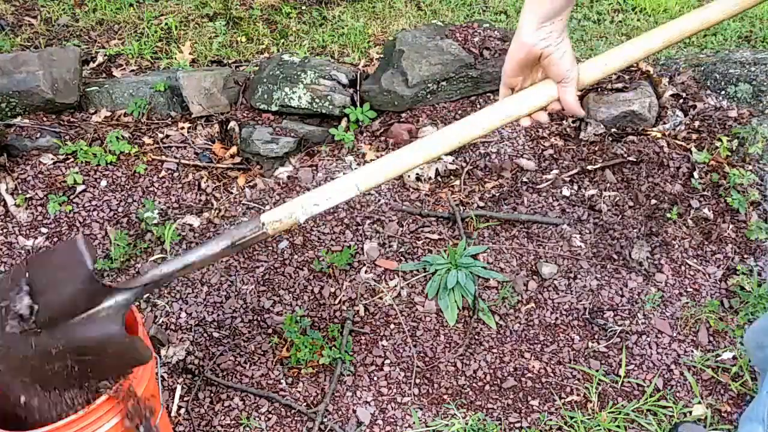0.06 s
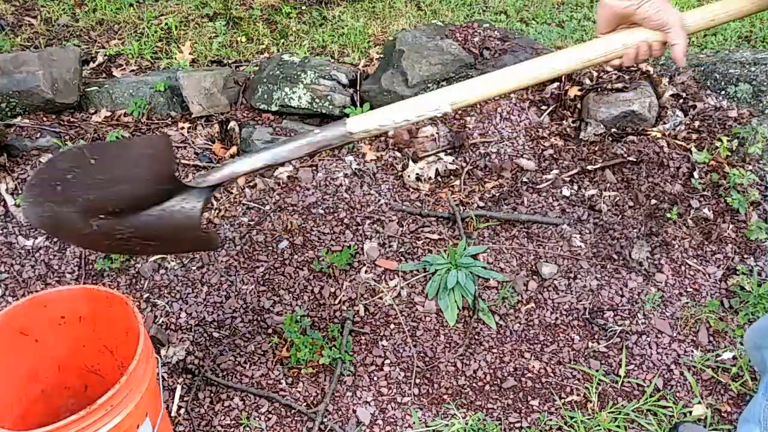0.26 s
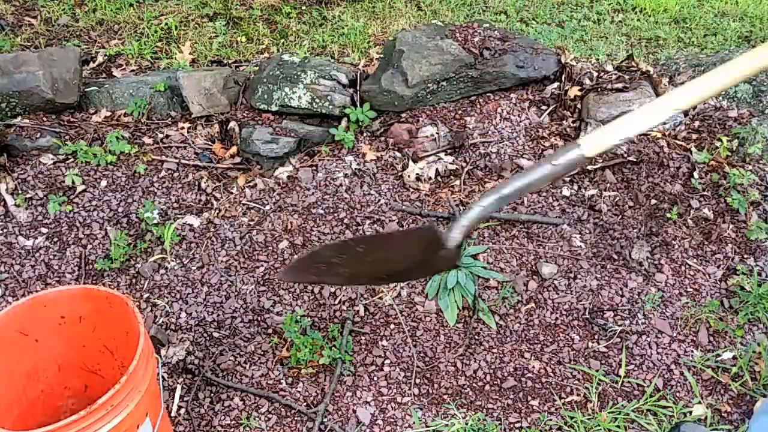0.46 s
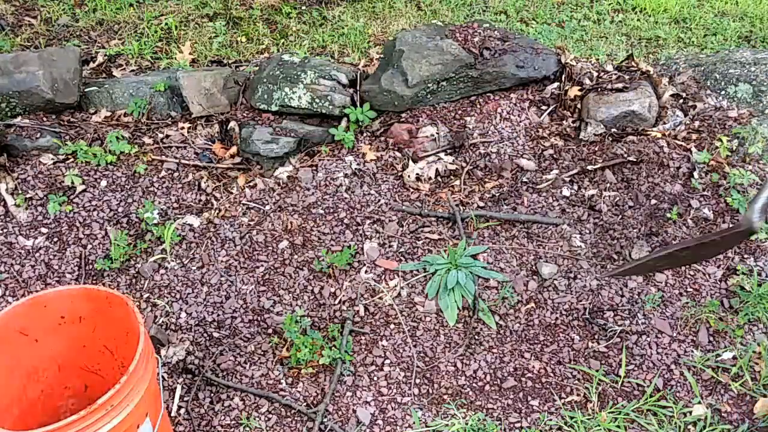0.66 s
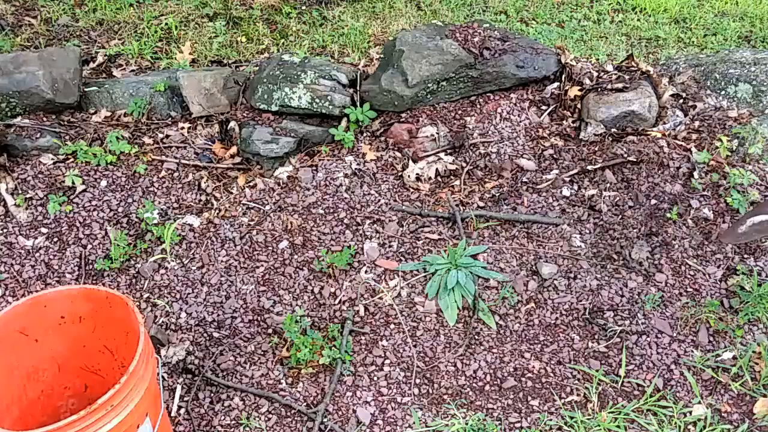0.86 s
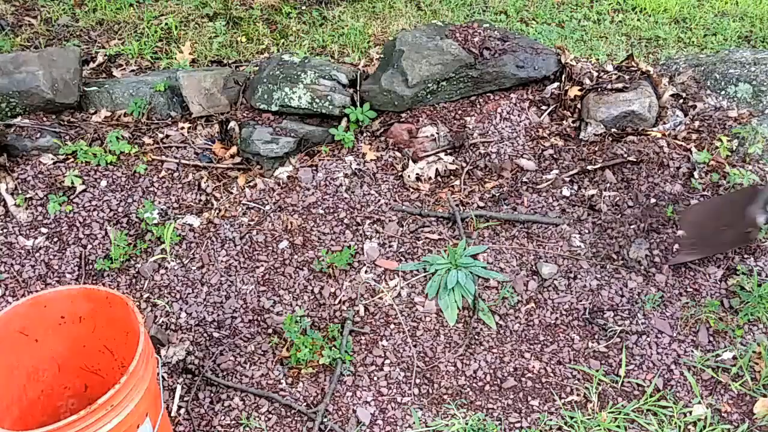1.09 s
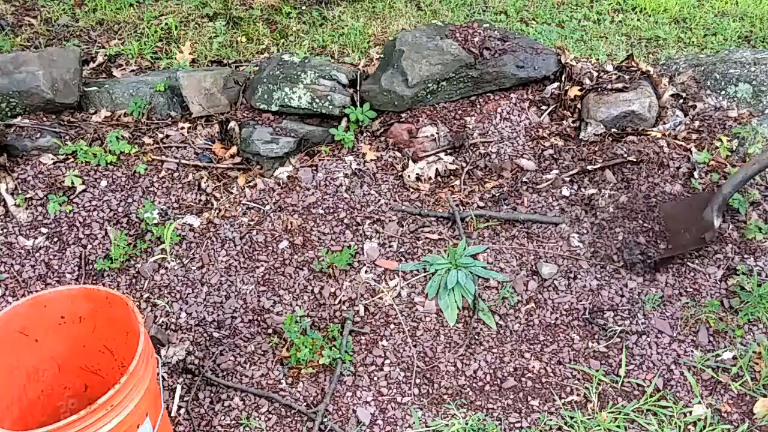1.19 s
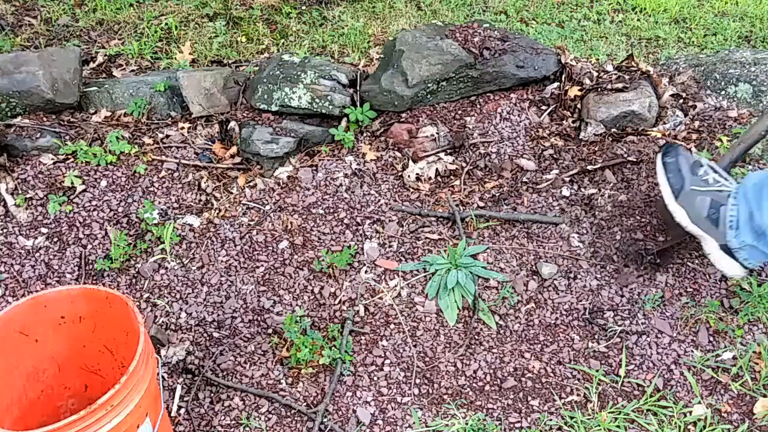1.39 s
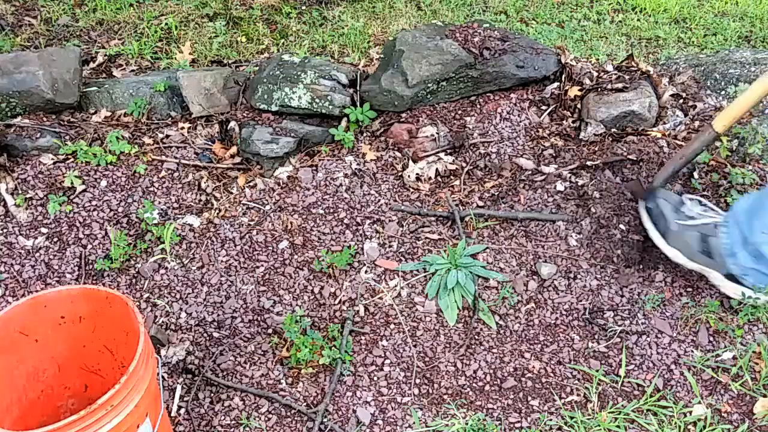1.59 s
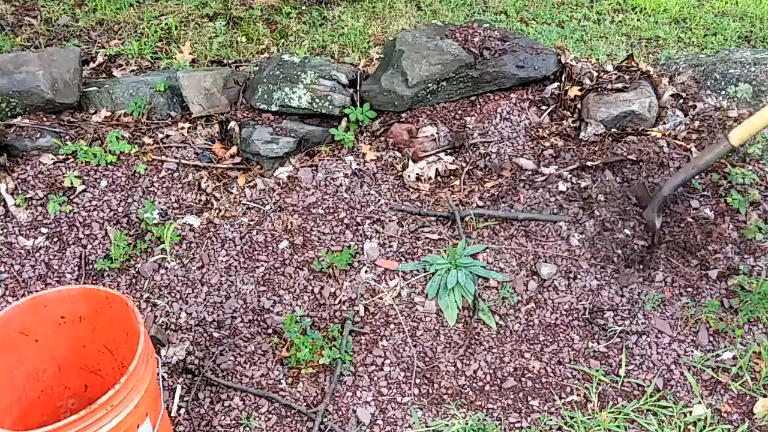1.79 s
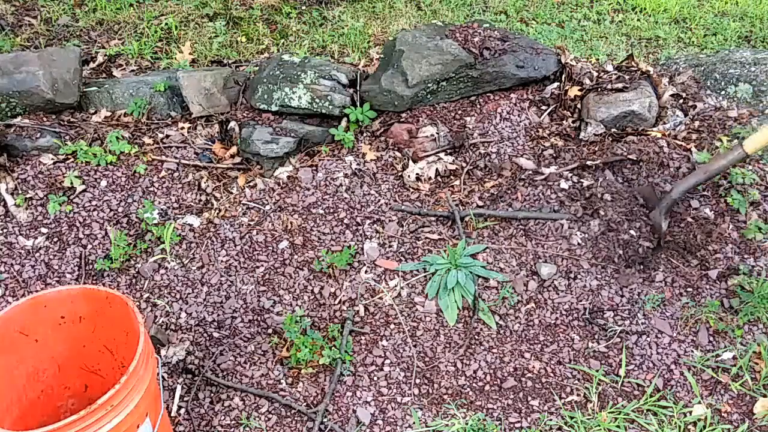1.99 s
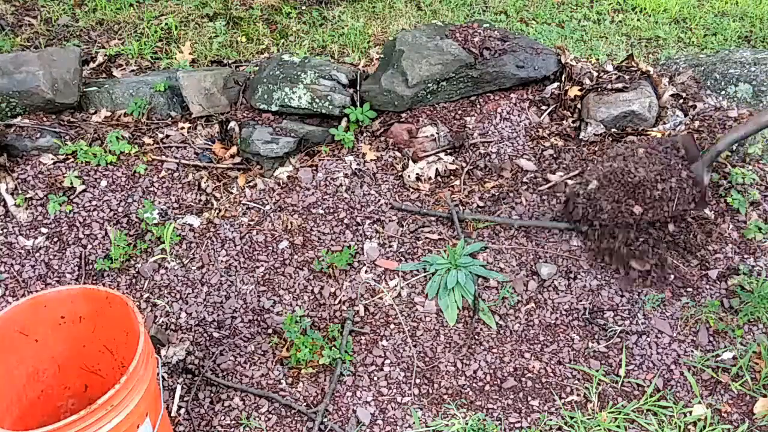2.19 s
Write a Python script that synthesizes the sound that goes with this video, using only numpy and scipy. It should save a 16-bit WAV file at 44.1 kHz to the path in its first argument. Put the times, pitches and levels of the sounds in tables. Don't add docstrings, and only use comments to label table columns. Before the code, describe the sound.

Gravel shovelling, heard close outdoors: a loud burst of stones batters a plastic bucket, a faint rattle and crunch follow, then a bright scraping stab, a duller stamp and small grinding clicks over faint insects and distant traffic.

```python
import sys
import numpy as np
from scipy import signal
from scipy.fft import rfft, irfft, next_fast_len
from scipy.io import wavfile
from scipy.ndimage import uniform_filter1d, map_coordinates

SR = 44100
rng = np.random.default_rng(int(sys.argv[2]) if len(sys.argv) > 2 else 0)


def transcribe(signal):
    frames = np.atleast_2d(signal).T
    limited = np.clip(frames, -1, 1)
    pcm = np.round(limited * 32767).astype(np.int16)
    wavfile.write(sys.argv[1], SR, pcm)


def attenuation_scalar(level_db):
    decades = np.asarray(level_db, float) / 20
    return 10 ** decades


N = 99225

# time in seconds, force in dB, heavy stones over grit in dB.
POUR_FORCE = [(.188, -49, -8), (.194, -21.5, 2.5), (.22, -20, 5), (.262, -18.5, 1), (.285, -26.5, 0),
              (.345, -32, 0), (0.371, -48.5, 6.5), (0.452, -57.5, -8), (0.538, -83, -15.5)]
# pitch in Hz, width in Hz, level in dB.
BUCKET_MODES = [(570, 25, -6.5), (740, 23, -6), (1090, 1400, -4.5), (1528, 46, 3), (1748, 30, -4),
                (1901, 39, -4), (3062, 120, -10)]
# pitch in Hz, width in Hz, level in dB.
BLADE_MODES = [(730, 97, -17), (1106, 60, -8), (1399, 140, -5), (1957, 110, -17.5), (2810, 49.6, -8.5),
               (2910, 22, -6)]


def unit(x):
    return x / np.sqrt(np.mean(x ** 2) + 1e-20)


def along(points, hz):
    f, v = np.transpose(points)
    return np.interp(np.log(hz + 1), np.log(f + 1), v)


def curves(rows):
    s, first, *cols = np.transpose(rows)
    t = np.arange(N) / SR
    return [np.interp(t, s, first, -140, -140)] + [np.interp(t, s, c) for c in cols]


def wobble(rate):
    knots = rng.standard_normal(int(N * rate / SR) + 4)
    return map_coordinates(knots, [np.arange(N) * rate / SR])


def filtered(x, response):
    m = next_fast_len(N + SR // 8, True)
    return irfft(rfft(x, m) * response(np.fft.rfftfreq(m, 1 / SR)), m)[..., :N]


def peak(f, hz, width_hz):
    return 1j * f * width_hz / (hz * hz - f * f + 1j * f * width_hz)


def noise_mode(hz, width_hz):
    return unit(filtered(rng.standard_normal(N), lambda f: peak(f, hz, width_hz) ** 2))


def sizes(u):
    scatter_db, biggest_db = 2.2, 4
    return attenuation_scalar(np.minimum(-scatter_db * np.log(u), biggest_db))


def clicks(at, hz, size, cycles):
    k = np.arange(128)
    turns = k * hz[:, None] / SR
    waves = size[:, None] * np.sin(2 * np.pi * turns) * np.exp(-turns / cycles) * (1 - k / len(k))
    return np.bincount((at[:, None] + k).ravel(), waves.ravel(), N + len(k))[:N]


def grit(span, spectrum, tilt_db):
    grains_per_s, hiss_share, top_from_hz = 5000, 0.62, 8430
    a, b = span
    u = rng.random((int(grains_per_s * (b - a) / SR), 3))
    lo, hi = spectrum[1][0], spectrum[-2][0]
    hz = lo + (hi - lo) * u[:, 1]
    at = a + (u[:, 0] * (b - a)).astype(int)
    white = clicks(at, hz, sizes(u[:, 2]) * hz ** .5, cycles=2.5)
    white = white / white[a:b].std() + hiss_share * rng.standard_normal(N)

    def colour(f):
        return attenuation_scalar(along(spectrum, f) + tilt_db * np.log2(np.clip(f / 6000, 1, 1.6)))

    full = filtered(white, colour)
    main = filtered(full, lambda f: 1 / (1 + (f / top_from_hz) ** 24))
    return np.array([main, full - main]) / main[a:b].std()


def flow(span_s, force_db, weight_db, body, low_hz, tilt_db, knee_db):
    # frequency in Hz, density in dB per Hz.
    grit_colour = [(1300, -67.5), (2500, -6), (3150, -6), (4270, -4.5), (6490, 0), (8600, -9), (15600, -22),
                   (16200, -51.5)]
    blows_per_s, dead_share, knock_top_hz = 2000, 0.98, 2300
    a, b = int(span_s[0] * SR), min(int(span_s[1] * SR), N)
    main, top = grit((a, b), grit_colour, tilt_db)
    clump_db = np.clip(-force_db / 18, 1, 2.5)
    top_db = 2.4 * np.minimum(force_db - knee_db, 0)
    fine = attenuation_scalar(force_db + clump_db * wobble(150)) * (main + attenuation_scalar(top_db) * top)

    u = rng.random((3, N))
    blows = (u[0] < blows_per_s / SR) * sizes(u[1]) * np.sign(u[2] - .5)

    def wall(f):
        band = signal.butter(6, [low_hz, 3600], 'band', analog=True)
        dead = dead_share / (1 + (1j * f / knock_top_hz)) ** 2
        modes = sum(attenuation_scalar(db) * peak(f, hz, width_hz) for hz, width_hz, db in body)
        return signal.freqs(*band, f)[1] * (dead + modes)

    driven = attenuation_scalar(force_db + weight_db + clump_db * wobble(90))
    steady, heavy = filtered(blows * [np.ones(N), driven], wall)
    return fine + heavy / steady[a:b].std()


def stroke(rows, body, low_hz, tilt_db, knee_db):
    return flow((rows[0][0], rows[-1][0]), *curves(rows), body, low_hz, tilt_db, knee_db)


def pushes(rows, width):
    t, out = np.arange(N) / SR, np.zeros(N)
    for s, length, db, hz, t60 in rows:
        attack = np.clip((t - s) / .006, 0, 1)
        decay = attenuation_scalar(-60 * np.maximum(t - s - length, 0) / t60)
        out += attenuation_scalar(db) * attack * decay * noise_mode(hz, width * hz)
    return out


def garden():
    # frequency in Hz, density in dB per Hz.
    garden_colour = [(25, -11.5), (100, -5.5), (250, -20.5), (2400, -24), (4600, -10), (7600, -15),
                     (8400, -31), (16500, -45)]
    # start in seconds, length in seconds, pitch in Hz, level in dB rms.
    calls = [(.02, .105, 3580, -67), (0, .018, 3050, -66), (.47, .23, 3850, -73), (1.1, .07, 1850, -74),
             (.03, .02, 1900, -68), (1.05, .02, 800, -64), (1.05, .015, 1300, -68),
             (1.445, .025, 1350, -68)]
    level_db, patchy_db = -63.5, 5
    z = signal.stft(rng.standard_normal(N + 512), nperseg=512)[2]
    field = uniform_filter1d(rng.standard_normal(z.shape), 3, 0)
    field = uniform_filter1d(field, 6, 1)
    bed = signal.istft(z * attenuation_scalar(patchy_db * unit(field)), nperseg=512)[1][:N]
    out = attenuation_scalar(level_db) * unit(filtered(bed, lambda f: attenuation_scalar(along(garden_colour, f))))
    t = np.arange(N) / SR
    for s, length, hz, db in calls:
        gate = np.clip(np.minimum(t - s, s + length - t) / 0.0044, 0, 1)
        turns = np.cumsum(hz + 45 * wobble(300)) / SR
        out += gate * attenuation_scalar(db + 3 * wobble(90)) * np.sin(2 * np.pi * turns)
    return out


def loose():
    # start in seconds, force in dB, heavy stones over grit in dB, dying in dB per second.
    handfuls = [(0.126, -32.5, 1, 144), (0.136, -36, -5, 1204), (0.148, -36, -8, 705),
                (0.154, -39, 0.5, 496.5), (.161, -31.5, 3, 694), (0.178, -37.5, 4, 297.5)]
    s, db, weight_db, dying = np.transpose(handfuls)
    t, end_s = np.arange(N) / SR, POUR_FORCE[1][0]
    last = np.maximum(np.searchsorted(s, t) - 1, 0)
    force_db = np.where(t > s[0], db[last] - dying[last] * (t - s[last]), -70)
    force_db = uniform_filter1d(force_db, size=60)
    force_db[(t < s[0] - .002) | (t > end_s)] = -140
    return flow((s[0], end_s), force_db, weight_db[last], BUCKET_MODES, low_hz=620, tilt_db=0, knee_db=-43.5)


def pour():
    return stroke(POUR_FORCE, BUCKET_MODES, low_hz=480, tilt_db=-6, knee_db=-55)


def thuds():
    # start in seconds, length in seconds, level in dB rms, pitch in Hz, t60 in seconds.
    hollow = [(0.193, 0.033, -36, 200, 0.33), (0.224, 0.072, -35, 222, 0.22),
              (.772, 0.02, -49.5, 900, 0.058), (0.844, 0.027, -43.5, 280, 0.13),
              (0.893, 0.048, -51, 239, 0.13), (1.197, 0.069, -45.5, 362, 0.1),
              (1.586, 0.065, -47, 280, 0.11), (1.634, 0.015, -40.5, 270, 0.067),
              (1.858, 0.043, -64.5, 332, 0.059)]
    return pushes(hollow, width=1)


def knocks():
    # start in seconds, peak in dB, pitch in Hz, t60 in seconds.
    heavy_stones = [(0.195, -9, 1910, 0.028), (0.195, -10, 770, 0.028), (0.211, -10, 1040, 0.028),
                    (0.214, -4.5, 1600, 0.028), (0.217, -3, 2030, 0.014), (0.218, -1, 1090, 0.014),
                    (0.229, -15, 230, 0.097), (0.23, -6, 1930, 0.014), (0.232, -7.5, 770, 0.014),
                    (0.233, -13.5, 1110, 0.055), (0.237, -2.5, 730, 0.019), (0.243, -10, 1497, 0.028),
                    (0.245, -9.5, 578, 0.055), (0.25, -11, 1250, 0.028), (0.253, -16.5, 1600, 0.055),
                    (0.291, -9.5, 1042, 0.014), (0.292, -19, 1711, 0.033), (0.302, -15.5, 1254, 0.028),
                    (0.307, -17.5, 990, 0.011), (0.315, -26.5, 1596, 0.12), (0.322, -14, 1320, 0.016),
                    (0.323, -23, 866, 0.04), (0.782, -31.5, 2200, 0.012), (0.846, -36, 231, 0.055),
                    (0.852, -33, 279, 0.045), (0.861, -25, 276, 0.029), (0.862, -32.5, 428, 0.031),
                    (0.873, -34, 325, 0.054), (0.888, -33.5, 612, 0.065), (0.897, -36, 334, 0.045),
                    (0.922, -33.5, 780, 0.036), (1.203, -22, 1940, 0.055), (1.206, -16.5, 1519, 0.026),
                    (1.208, -11, 2946, 0.015), (1.213, -6.5, 3086, 0.016), (1.217, -13, 1229, 0.017),
                    (1.23, -16.5, 2897, 0.014), (1.233, -25, 3137, 0.11), (1.601, -18.5, 2040, 0.016),
                    (1.603, -15.5, 1030, 0.011), (1.608, -26, 3103, 0.068), (1.609, -24, 684, 0.021),
                    (1.616, -20.5, 2140, 0.026), (1.619, -19, 1010, 0.0092), (1.846, -41, 782, 0.053),
                    (1.871, -35.5, 704, 0.024), (1.877, -36.5, 1484, 0.03), (1.881, -40, 547, 0.032),
                    (1.886, -30.5, 1000, 0.012)]
    attack_s = .001
    out, t = np.zeros(N + SR), np.arange(SR // 8) / SR
    for s, db, hz, t60 in heavy_stones:
        envelope = attenuation_scalar(db - 60 * t / t60) * (1 - np.exp(-t / attack_s))
        out[round(s * SR):][:len(t)] += envelope * np.sin(2 * np.pi * hz * t)
    return out[:N]


def booms():
    # start in seconds, length in seconds, level in dB rms, pitch in Hz, t60 in seconds.
    bucket_air = [(.24, 0.042, -31.5, 226, .15), (.31, 0.039, -45, 228, 0.18)]
    return pushes(bucket_air, width=.22)


def rattle():
    # time in seconds, force in dB, heavy stones over grit in dB.
    force = [(.603, -63.5, -1), (.61, -58.5, 5.5), (.664, -58, 4.5), (.74, -54.5, -5), (.79, -51, -2),
             (.815, -52.5, -1), (.842, -68, 6)]
    return stroke(force, BLADE_MODES, low_hz=1300, tilt_db=0, knee_db=-49.5)


def ticks():
    # start in seconds, peak in dB, pitch in Hz.
    single_stones = [(.632, -36, 2200), (.783, -37, 2600), (.791, -35, 5000), (.812, -38, 2000),
                     (.899, -34, 5500), (.916, -37, 3300), (.962, -36, 6000), (.999, -38, 5800),
                     (1.047, -43, 4200), (1.247, -10, 6300), (1.456, -40, 6400), (1.6265, -14, 6000),
                     (1.8375, -35, 7500), (1.842, -34, 7000), (1.8455, -35, 7500), (1.8525, -27, 6000),
                     (1.9125, -31, 7200), (2.019, -40, 7000), (2.029, -35, 6400), (2.08, -36, 6000),
                     (2.108, -43, 1900), (2.157, -41, 6500), (2.244, -32, 6500)]
    s, db, hz = np.transpose(single_stones)
    at = (s * SR).astype(int)
    partners = [(0, 1, 0), (9, .45, -17), (4, 1.3, -4), (40, .9, -7)]
    parts = sum(clicks(at + lag, ratio * hz, attenuation_scalar(db + 2 + loss_db), cycles=2.6)
                for lag, ratio, loss_db in partners)
    return filtered(parts, lambda f: (1j * f / (1200 + 1j * f)) ** 4 / (1 + (f / 10000) ** 12))


def step():
    # time in seconds, force in dB, heavy stones over grit in dB.
    force = [(.842, -53, -3), (.86, -47.5, -1), (.9, -49.5, 1), (.945, -48.5, 3.5), (.98, -53, 2),
             (1.0, -54, -7.5), (1.06, -60.5, -16.5)]
    # pitch in Hz, width in Hz, level in dB.
    earth = [(416, 500, 3.5), (861, 530, 7.5), (1557, 360, -10)]
    return stroke(force, earth, low_hz=440, tilt_db=3.1, knee_db=-49.5)


def slide():
    # time in seconds, force in dB.
    skim = [(1.03, -70), (1.09, -53), (1.15, -57.5), (1.19, -58.5)]
    # frequency in Hz, density in dB per Hz.
    scrape_colour = [(3500, -59), (5500, -22), (6300, -5.5), (7200, 3), (9500, -40.5)]
    force_db, = curves(skim)
    span = int(skim[0][0] * SR), int(skim[-1][0] * SR)
    return attenuation_scalar(force_db + 1.9 * wobble(83)) * grit(span, scrape_colour, 0).sum(0)


def bite():
    # time in seconds, force in dB, heavy stones over grit in dB.
    force = [(1.188, -51, -20), (1.193, -20.5, -25), (1.21, -17, -5.5), (1.226, -20.5, -6.5),
             (1.252, -21.5, -8.5), (1.278, -36, -8), (1.3, -47.5, -6.5), (1.39, -53.5, -30),
             (1.5, -69.5, -30.5)]
    return stroke(force, BLADE_MODES, low_hz=740, tilt_db=2.6, knee_db=-49)


def stamp():
    # time in seconds, force in dB, heavy stones over grit in dB.
    force = [(1.56, -63, -19), (1.58, -29, -8), (1.6, -26.5, -5), (1.628, -27.5, -4), (1.65, -37.5, 0.5),
             (1.668, -46, -3), (1.72, -51.5, -13.5), (1.77, -58, -18.5), (1.835, -56, -27)]
    return stroke(force, BLADE_MODES, low_hz=450, tilt_db=0, knee_db=-49)


def settle():
    # time in seconds, force in dB, heavy stones over grit in dB.
    force = [(1.832, -52.5, -15.5), (1.845, -48, -9), (1.862, -44, -3), (1.89, -50, 2.5), (1.92, -53, -2.5),
             (1.94, -54, -14), (2.0, -64.5, -11.5)]
    return stroke(force, BLADE_MODES, low_hz=500, tilt_db=4.08, knee_db=-52)


def lever():
    # time in seconds, force in dB, heavy stones over grit in dB.
    force = [(1.995, -60, -18), (2.015, -52.5, -8), (2.03, -53.5, 1.5), (2.104, -57, -0.5), (2.17, -53, -6),
             (2.25, -44.5, -1.5)]
    return stroke(force, BLADE_MODES, low_hz=1270, tilt_db=2, knee_db=-44.5)


def ring():
    # time in seconds, level in dB.
    hum = [(2.005, -85), (2.018, -67), (2.04, -75.5), (2.16, -84.5), (2.175, -63), (2.25, -57.5)]
    loaded_hz, flex_hz, width_hz = 782, 865, 74
    level_db, = curves(hum)
    flex = np.exp(-((np.arange(N) / SR - 2.12) / 0.043) ** 2)
    loaded = attenuation_scalar(level_db) * noise_mode(loaded_hz, width_hz)
    return loaded + attenuation_scalar(-71.5) * flex * noise_mode(flex_hz, width_hz)


def ground_notch(stones):
    notch_hz, width_hz, depth = 2412, 200, .8
    return filtered(stones, lambda f: 1 - depth * peak(f, notch_hz, width_hz))


def rock_echo(stones):
    echo_db, t60_s, low_hz, high_hz = -8.5, 0.074, 2500, 8000
    tail = rng.standard_normal(SR // 2) * attenuation_scalar(-60 * np.arange(SR // 2) / SR / t60_s)
    echo = signal.fftconvolve(stones, tail / np.linalg.norm(tail))[:N]
    echo = filtered(echo, lambda f: 1 / (1 + (f / high_hz) ** 12) / (1 + (low_hz / (f + 1)) ** 2))
    return attenuation_scalar(echo_db) * echo


def scene():
    tipping = loose() + pour() + thuds() + knocks() + booms() + rattle() + ticks()
    digging = step() + slide() + bite() + stamp() + settle() + lever() + ring()
    stones = ground_notch(tipping + digging)
    return (stones + rock_echo(stones) + garden())[None]


def low_pass(x):
    return signal.sosfilt(signal.butter(12, 16610, fs=SR, output="sos"), x)


def record(dry):
    ceiling, top_hz = .85, 16200
    soft = dry[0] / (1 + np.abs(dry[0] / ceiling) ** 4) ** .25
    mix = filtered(soft, lambda f: f < top_hz)[None]
    return low_pass(mix)


dry = scene()
out = record(dry)
transcribe(out)
```